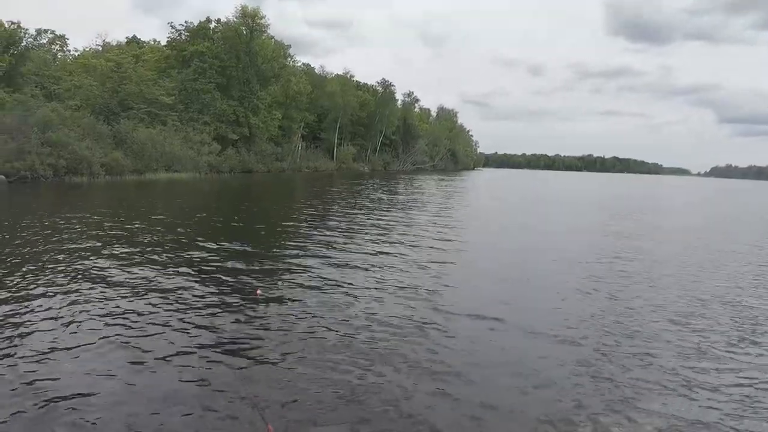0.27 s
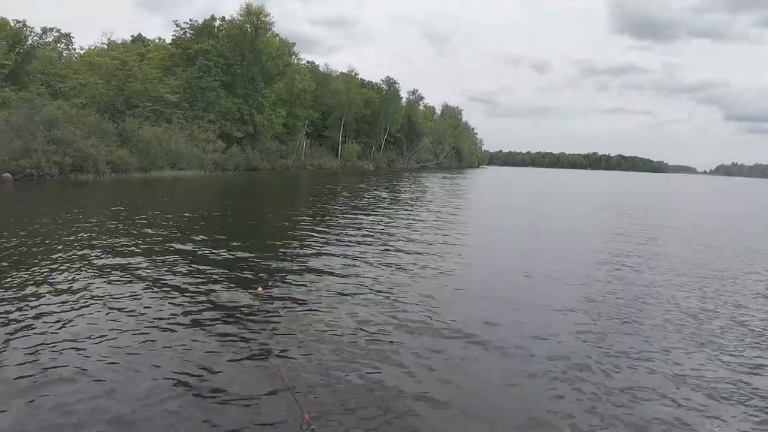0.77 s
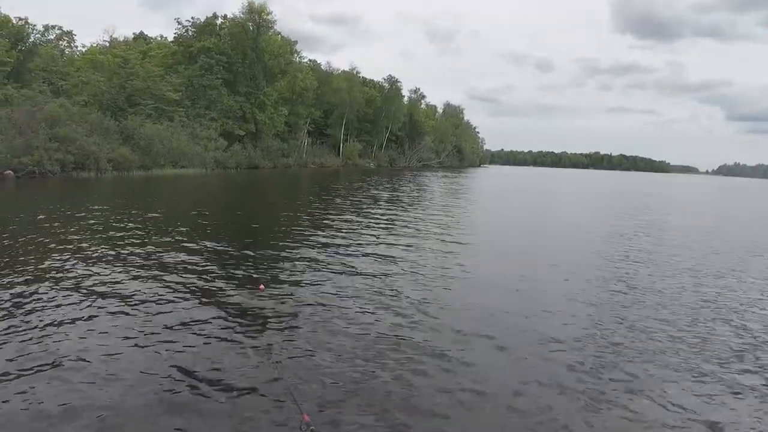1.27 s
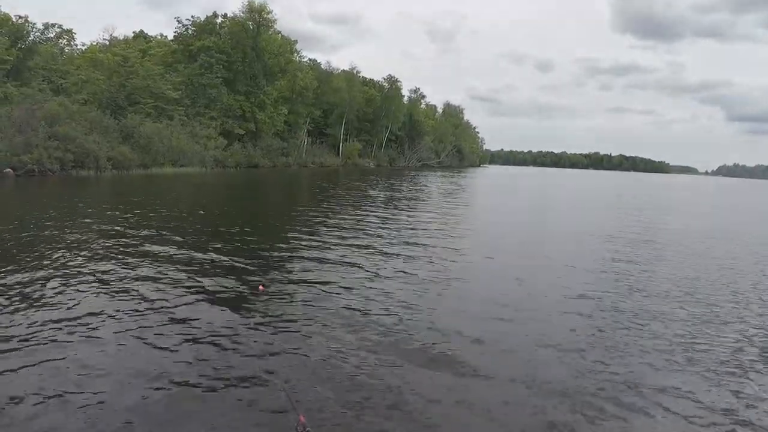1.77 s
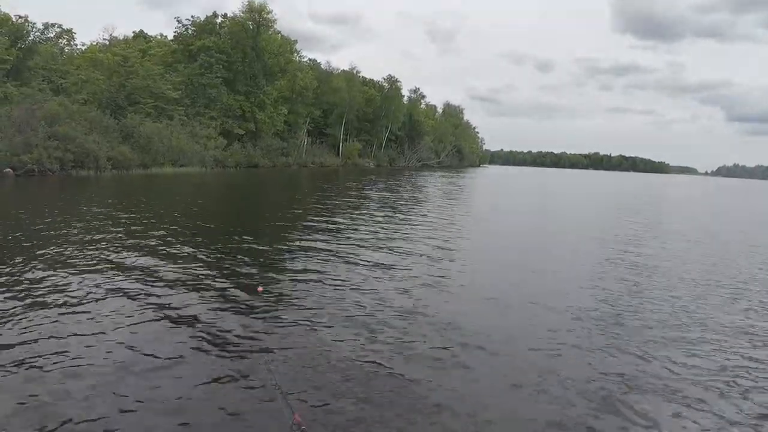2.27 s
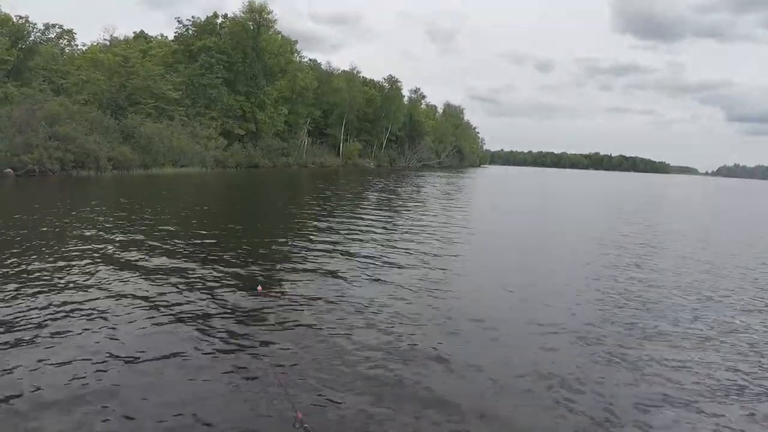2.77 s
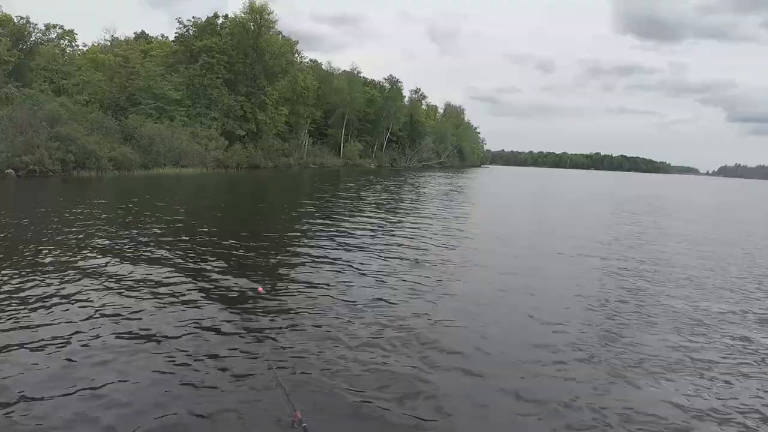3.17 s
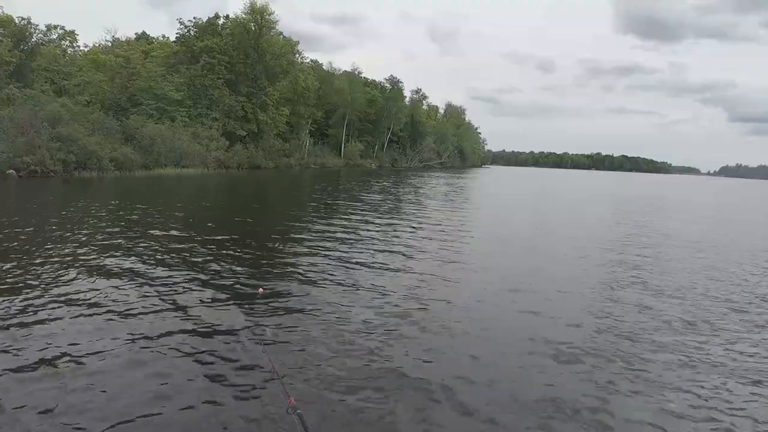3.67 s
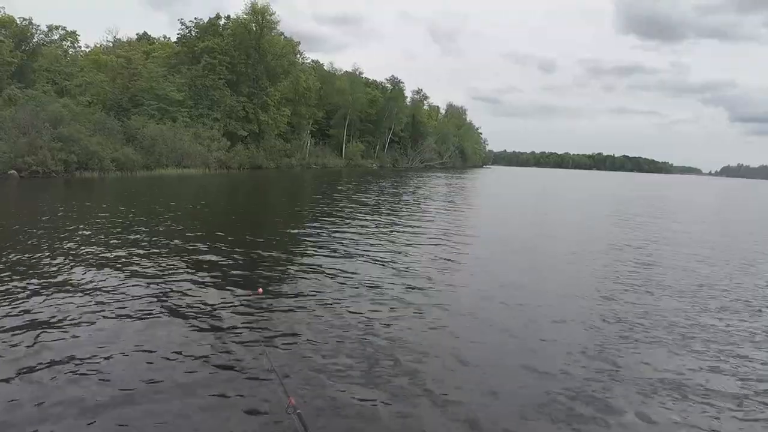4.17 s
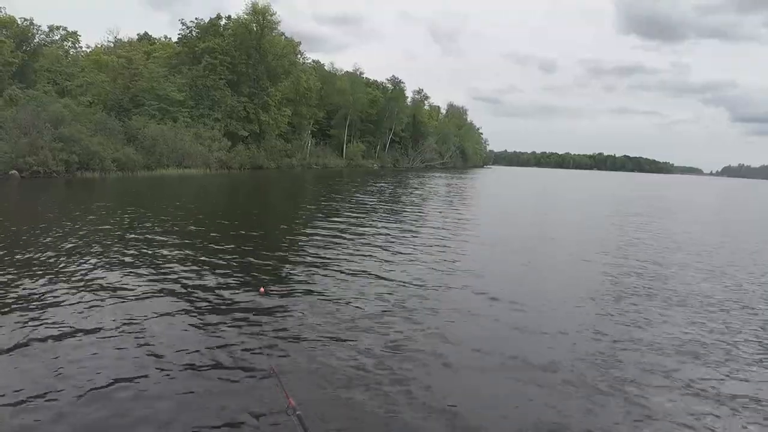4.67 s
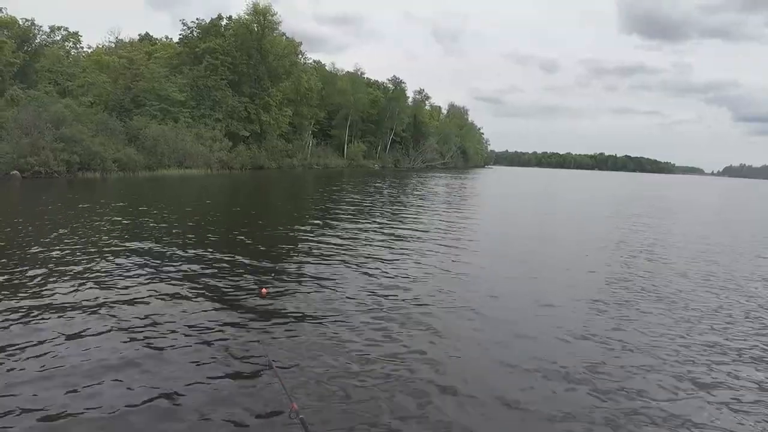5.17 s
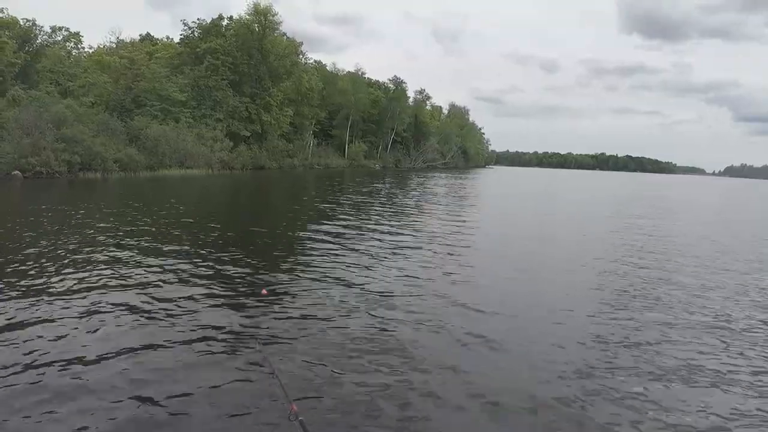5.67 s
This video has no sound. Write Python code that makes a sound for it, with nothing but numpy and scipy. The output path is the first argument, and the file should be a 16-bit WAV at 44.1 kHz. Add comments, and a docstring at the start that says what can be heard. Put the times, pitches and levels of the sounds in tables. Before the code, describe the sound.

Water laps against a small boat on a quiet lake, as wind buffets the microphone, a songbird twitters and a loon calls.

```python
"""Small boat on a lake

A loon gives its quivering call, a songbird whistles, a far crow caws, and the wooded shore
sends back a soft echo. Little waves trap air and knock under the hull, drops tick, water stirs
and leaves hiss. Swirling wind rumbles on the two microphone openings."""
import sys
import numpy as np
from scipy import signal
from scipy.io import wavfile

SR = 44100
rng = np.random.default_rng(int(sys.argv[2]) if len(sys.argv) > 2 else 0)


def master(y):
    """Save y as 16-bit WAV."""
    cut = np.clip(np.atleast_2d(y).T, -1, 1)
    pcm = np.round(cut * 32767)  # scale
    wavfile.write(sys.argv[1], SR, pcm.astype(np.int16))


N = 261513
T = np.arange(N) / SR


def from_db(db):
    """Turn decibels into a number to multiply a sound by."""
    return 10 ** (np.asarray(db) / 20)


def unit_level(x):
    """Scale a signal so its average strength (rms) is 1."""
    return x / np.sqrt(np.mean(x ** 2) + 1e-20)


def left_right(level_db, pan_db):
    """Gains for the two sides; the left is pan_db louder than the right."""
    return from_db([[level_db + pan_db / 2], [level_db - pan_db / 2]])


def at_hz(table, hz):
    """Read a (frequency, value) table between its rows."""
    frequencies, values = np.transpose(table)
    return np.interp(np.log(hz), np.log(frequencies), values)


def band(x, low_hz, high_hz, order=2):
    """Keep the part of a sound between two frequencies."""
    return signal.sosfilt(signal.butter(order, [low_hz, high_hz], "band", fs=SR, output="sos"), x)


def drift(rate_hz):
    """A smooth random wobble, about 1 in size."""
    r = np.exp(-80 * np.pi * rate_hz / SR)
    slow = signal.lfilter([1], [1, -2 * r, r * r], rng.standard_normal(N // 40 + 2002))[2000:]
    return np.interp(np.arange(N) / 40, np.arange(len(slow)), unit_level(slow))


def add(out, start_s, sound):
    """Mix a sound in at the given time."""
    i = max(round(start_s * SR), 0)
    out[..., i:i + sound.shape[-1]] += sound[..., :out.shape[-1] - i]


def flickering_noise(spectrum, likeness, flicker_db, rate_hz):
    """Stereo noise in half-octave bands, each with its own level, flicker and left-right likeness."""
    out, shared_drift = 0, drift(rate_hz / 3)
    edges = 16 * 2 ** np.arange(0, 10.1, .5)
    white = rng.standard_normal((2, 2, N))
    for k, (low, high) in enumerate(zip(edges, edges[1:])):
        hz = np.sqrt(low * high)
        if spectrum[0][0] / 1.3 < hz < spectrum[-1][0] * 1.3:
            mid, side = band(white[k % 2], low, high)
            alike = at_hz(likeness, hz)
            gain = from_db(at_hz(spectrum, hz) + flicker_db * (shared_drift + drift(rate_hz)))
            out = out + gain * (np.sqrt(1 + alike) * mid + np.sqrt(1 - alike) * side * [[1], [-1]])
    return unit_level(out)


# How much of each overtone the loon's throat lets through: (frequency [Hz], gain [dB])
THROAT_GAINS = [(1250, -12.5), (1400, -3.5), (1650, -13.5), (1900, -50.5), (2200, -46.5), (2340, -26.5),
                (2440, -28), (2850, -54), (3200, -38.5), (3450, -49), (3560, -64.5), (3700, -69.5)]
def loon_voice(hz, level_db, lift_db, fade_s=.013):
    """A pure tone plus two overtones shaped by the throat; lift_db changes the lower overtone."""
    t = np.arange(len(hz)) / SR
    phase = 2 * np.pi * np.cumsum(hz) / SR
    second = from_db(at_hz(THROAT_GAINS, 2 * hz) + lift_db) * np.sin(2 * phase)
    third = from_db(at_hz(THROAT_GAINS, 3 * hz)) * np.sin(3 * phase)
    fade = np.clip(np.minimum(t, t[-1] - t) / fade_s, 0, 1)
    return np.sqrt(2) * from_db(level_db) * fade * (np.sin(phase) + second + third)


# The low note that opens each call: (time from the quiver's start [s], pitch [Hz], level vs call [dB])
OPENING_NOTE = [(-.118, 665.5, -21), (-.09, 690, -18), (-.052, 626, -23.5), (.003, 846, -8)]
# Quivering calls: (start [s], length [s], level at top pitch [dB], bottom pitch [Hz], its sag [Hz/s],
# droop of the top pitch [Hz/s^2], slowing of the quiver [Hz/s], overtone lift [dB], head start [swings])
LOON_CALLS = [(-.4, 0.53, -46.5, 950, 169.3, 1305, 7.7, 8.5, 0),
              (1.36, 0.491, -43.5, 999.6, 310, 3394, 24.8, 3.5, .065),
              (5.34, .495, -36, 925.5, 130, 2600, 9.0, -8.5, .01)]
def loon(top_hz=1206, quiver_hz=9.6, max_swings=4.5, lead_s=.6):
    """A low note, then a tone that swings up and down in pitch. Begins lead_s before the scene."""
    out = np.zeros(N + round(lead_s * SR))
    times, pitches, levels = np.transpose(OPENING_NOTE)
    rows = np.arange(len(times))
    place = np.interp(np.arange(times[0], times[-1], 1 / SR), times, rows)
    place = np.floor(place) + .5 - .5 * np.cos(np.pi * (place % 1))   # ease from row to row
    opening_hz, opening_db = np.interp(place, rows, pitches), np.interp(place, rows, levels)
    for start, length, level_db, bottom_hz, sag, droop, slowing, lift_db, head_start in LOON_CALLS:
        t = np.arange(0, length, 1 / SR)
        swing_rate = quiver_hz - slowing * np.maximum(t - .28, 0)
        swings = np.minimum(head_start + np.cumsum(swing_rate) / SR, max_swings)
        # the top starts a little low, and falls again as the bird tires
        top = top_hz - 40 * np.maximum(1 - swings, 0) - droop * np.maximum(t - .2, 0) ** 2
        bottom = bottom_hz - sag * t
        height = (.5 + .5 * np.cos(2 * np.pi * swings)) ** .78   # lingers near the top
        hz = bottom + (top - bottom) * height
        call_db = level_db + .0425 * (hz - top_hz)   # higher is louder
        add(out, lead_s + start, loon_voice(hz, call_db, lift_db))
        add(out, lead_s + start + times[0], loon_voice(opening_hz, level_db + opening_db, lift_db=-.5))
    return out


def shore_echo(sound, delay_s, fade_s, bank_db, bank_s=.28, flutter_db=3.5):
    """Trees scatter a sound into echoes that fall 60 dB in fade_s; the far bank adds a late swell."""
    t = np.arange(0, 1, 1 / SR)
    shape = from_db(-60 * t / fade_s) * np.clip((t - delay_s) / .007, 0, 1)
    shape += from_db(bank_db) * np.exp(-((t - bank_s) / .18) ** 2)
    cloud = rng.standard_normal((2, len(t))) * shape
    cloud /= np.sqrt(np.sum(cloud ** 2) / 2)
    echo = signal.fftconvolve(sound[None], cloud, axes=1)[:, :len(sound)]
    return echo[:, -N:] * from_db(flutter_db * drift(40))   # moving leaves blur it


# The wind's rise and fall: (time [s], relative level [dB], left minus right [dB])
GUSTS = [(0.04, -49, -8), (0.246, -44, 1.0), (0.572, -51, -12), (0.66, -54.5, 11.0), (0.976, -55, -4.5),
         (1.008, -55, 13.5), (1.236, -40, -1.0), (1.418, -44.5, -10), (1.608, -54, 10.0),
         (1.842, -55.5, -2), (1.9, -56.5, 19), (2.0, -55.5, 2.5), (2.38, -50, 2), (2.64, -69, 1.0),
         (2.7, -55, 1), (2.84, -66, -2), (2.92, -45, 2.5), (3.16, -58, 2.0), (5.15, -62, -0.5),
         (5.88, -57.5, 3.0)]
# The wind's deep tone: (frequency [Hz], relative level [dB])
WIND_SPECTRUM = [(11, -31), (18, 10.5), (48, 12.5), (77, 1.5), (129, -26.5), (184, -22.5), (226, -20),
                 (309, -21.5), (400, -34), (520, -77), (880, -120)]
def wind():
    """Swirling air rumbles differently on each microphone opening."""
    times, level_db, pan_db = np.transpose(GUSTS)
    left_db = np.interp(T, times, level_db + pan_db / 2)
    right_db = np.interp(T, times, level_db - pan_db / 2)
    rumble = flickering_noise(WIND_SPECTRUM, [(20, .012), (400, .019)], flicker_db=1.5, rate_hz=30)
    return np.sqrt(2) * from_db([left_db, right_db]) * rumble


# How alike the two sides are, for the water and the hiss: (frequency [Hz], likeness [0 to 1])
SIDE_LIKENESS = [(100, 1), (300, 0.97), (1000, 0.35), (3000, 0.11), (8000, 0.057)]
# The water's rise and fall: (time [s], level [dB])
WATER_LEVELS = [(0.0, -46), (0.21, -47.5), (1.05, -51.5), (1.3, -48.5), (1.74, -55.5), (2.04, -54.5),
                (2.4, -51.5), (2.76, -49.5), (2.94, -55.5), (3.81, -55.5), (4.86, -58.5), (5.9, -54)]
# The water's low tone: (frequency [Hz], relative level [dB])
WATER_SPECTRUM = [(60, -11.5), (100, 0), (140, 1.5), (200, -0.5), (280, -12), (420, -21.5)]
def stirring_water():
    """Water moving round the boat makes a low murmur."""
    level_db = np.interp(T, *np.transpose(WATER_LEVELS))
    return from_db(level_db) * flickering_noise(WATER_SPECTRUM, SIDE_LIKENESS, flicker_db=1, rate_hz=6.2)


# The tone of the background hiss: (frequency [Hz], relative level [dB])
HISS_SPECTRUM = [(150, -16.5), (250, -6), (318, -8.5), (385, -7.5), (563, -12.5), (730, -14.5), (1140, -16),
                 (2060, -24.5), (3010, -22.5), (6120, -30), (7020, -34.5), (9920, -34.5), (12200, -50),
                 (13500, -42.5), (15600, -55.5)]
def leaves_and_hiss(level_db=-70.5):
    """Leaves and the microphone's own noise make a faint, almost steady hiss."""
    return from_db(level_db) * flickering_noise(HISS_SPECTRUM, SIDE_LIKENESS, flicker_db=.25, rate_hz=9)


# Air pockets trapped under the hull: (time [s], level [dB], pitch [Hz], length [s],
# slosh vs knock [dB], relative slap level [dB])
AIR_POCKETS = [(.009, -44.5, 470, 0.015, -8, -53), (.122, -30.5, 348.5, 0.032, -8.5, -56),
               (.123, -26.5, 569, 0.011, -7, -42), (.149, -42, 377, 0.016, 1, -65),
               (.388, -47.5, 572, 0.016, -7, -54), (.674, -51, 167, 0.011, -1, -65),
               (.683, -34, 302, 0.0098, -3, -57.5), (.709, -41.5, 292, 0.032, -16, -49.5),
               (.739, -25, 377, .011, -4.5, -45), (.758, -45, 376, 0.023, -12, -72),
               (.837, -28.5, 577, .014, -16, -68), (1.389, -32, 179, 0.011, -4.5, -54),
               (1.406, -18, 524, 0.0081, -29.5, -30), (1.424, -30, 492.5, 0.021, -20, -55),
               (1.433, -26, 545, 0.0091, -8, -63), (2.12, -47, 808, 0.0086, 1, -54.5),
               (2.175, -29, 678, 0.0097, -12, -43), (2.199, -33, 235, .011, -29, -56),
               (2.206, -33, 435, 0.0094, -6, -49), (2.23, -47.5, 159, 0.041, -15, -60),
               (2.254, -37, 155, 0.0092, -1.5, -69), (2.621, -39, 223.3, 0.053, -10, -50.5),
               (2.63, -34.5, 216, .013, -1.5, -49.5), (2.668, -40, 214, .023, -5, -51.5),
               (2.782, -38.5, 552, .019, -9, -70), (2.833, -27, 550, 0.013, -14, -73),
               (2.894, -35, 612, 0.0093, -11, -43), (2.899, -47, 261, 0.029, -13, -66),
               (3.238, -33.5, 573, 0.011, -10.5, -61), (3.259, -34.5, 420, 0.014, -12.5, -52),
               (3.288, -22.5, 370, 0.018, -15, -49.5), (3.319, -40, 235.5, 0.027, -4.5, -64.5),
               (3.353, -37, 370, .018, -9, -70), (3.478, -43, 370, 0.0094, -11.5, -53),
               (3.498, -42, 435, .019, -13, -64), (3.663, -27, 520, 0.0093, -10.5, -54),
               (3.669, -36.5, 381, .014, -0.5, -59.5), (3.674, -37.5, 610, 0.029, -24, -59),
               (3.699, -42, 546, 0.011, -12, -69), (3.918, -55, 604, 0.0083, -16, -66),
               (3.925, -39, 273.5, 0.023, -3, -67), (4.2, -42, 636, 0.0094, -18, -72),
               (4.208, -33.5, 668, 0.0119, -13, -75), (4.222, -48.5, 642, 0.014, -7, -76),
               (4.612, -31.5, 555, 0.015, -15, -67), (4.625, -44, 570, 0.019, -16, -79),
               (5.161, -36, 581.4, 0.027, -8.5, -68), (5.655, -35.5, 410, 0.036, -17, -61),
               (5.689, -60, 195, 0.02, 1.5, -63), (5.829, -44.5, 518, 0.021, 7, -47.5),
               (5.853, -36, 696, 0.01, -7.5, -38), (5.873, -28, 418, 0.015, -11, -53),
               (5.899, -43, 195, 0.077, -11, -69)]
def knocks(pitch_rise=.041, thump_db=-12, slosh_fade_s=.26):
    """Each air pocket rings briefly at a rising pitch, with a thump and a slap; then water sloshes."""
    out, t = np.zeros(N), np.arange(0, .4, 1 / SR)
    noise = rng.standard_normal((len(AIR_POCKETS), 3, len(t)))
    onset = np.clip(t / .003, 0, 1)
    for (start, level_db, hz, length, slosh_db, slap_db), (spray, push, scatter) in zip(AIR_POCKETS, noise):
        progress = np.clip(t / length, 0, 1)
        swell = np.sin(np.pi * progress ** .8) ** 1.5
        ring = swell * np.sin(2 * np.pi * hz * t * (1 + pitch_rise * progress))
        thump = from_db(thump_db - 60 * t / .13) * unit_level(band(push, .36 * hz, .89 * hz)) * onset
        slap = from_db(slap_db - 1.5 - 60 * t / .043) * band(spray, 800, 3200, order=3)
        knock = from_db(level_db) * (ring + thump) + slap
        fade_s = slosh_fade_s * (400 / hz) ** .47   # low pockets are large and slosh longer
        scatter = scatter * from_db(-60 * t / fade_s) * progress ** 2
        slosh = unit_level(signal.fftconvolve(knock, scatter)[:len(t)]) * np.sqrt(np.mean(knock ** 2))
        add(out, start, knock + from_db(slosh_db) * slosh)
    return out


# The hull's own notes: (pitch [Hz], relative level [dB], time to fade by 60 dB [s])
HULL_NOTES = [(122.1, -2.5, 0.28), (162.3, -7.5, 0.24), (209.5, -2.5, 0.13), (265.6, -8.5, 0.17),
              (335.5, -6.5, 0.19), (364.2, -11, 0.16), (403, -5.5, 0.076), (450.8, -8.5, 0.1),
              (513.6, -13, 0.18), (519.2, -10, 0.093), (580, -6, 0.072), (640, -6.5, 0.049),
              (744, -15, 0.24), (761, -12, 0.074), (913, -11.5, 0.29), (1112, -16, 0.31)]
def hull_ring(knocking, gain_db=-38):
    """The knocks shake the hull, which rings on at its own notes."""
    out = 0
    for k, (hz, level_db, fade_s) in enumerate(HULL_NOTES):
        decay, step = from_db(-60 / (fade_s * SR)), 2 * np.pi * hz / SR
        ring = signal.lfilter([0, np.sin(step)], [1, -2 * decay * np.cos(step), decay ** 2], knocking + 1e-18)
        out += (-1) ** k * from_db(level_db + gain_db) * ring
    return out


# The songbird's notes: (start [s], length [s], first pitch [Hz], middle pitch [Hz], last pitch [Hz],
# first level [dB], last level [dB])
WHISTLES = [(0.029, 0.058, 3290, 3090, 3360, -79, -80), (.96, .045, 4850, 4400, 3380, -77, -76),
            (1.042, 0.038, 2720, 2080, 2770, -69, -62), (1.073, 0.026, 2770, 2250, 2150, -58.5, -72.5),
            (1.098, 0.022, 2200, 2800, 3456, -66, -71), (1.118, 0.023, 3440, 3460, 3370, -69.5, -60.5),
            (1.138, .04, 3390, 2770, 3160, -55, -60), (1.221, 0.038, 2840, 2870, 2930, -70.5, -63.5),
            (1.43, .03, 2760, 2460, 2980, -71, -69.5), (1.458, .02, 3000, 2830, 2620, -70, -65),
            (1.498, 0.073, 2760, 2850, 2780, -58.5, -66.5), (1.752, 0.021, 3267, 3350, 3390, -73, -57),
            (1.769, 0.022, 3080, 2850, 2920, -58.5, -55), (1.787, 0.07, 2908, 3000, 2985, -55, -66),
            (1.858, 0.047, 4690, 2990, 2360, -72, -60), (1.9, 0.025, 2330, 2360, 2340, -61, -68),
            (2.203, .04, 2870, 2900, 2430, -66.5, -75.5), (2.244, 0.035, 2460, 3450, 3340, -67.5, -71.5),
            (2.315, 0.062, 2960, 2640, 2196, -61, -81), (2.386, .055, 2186, 3300, 3970, -71, -77),
            (2.443, 0.029, 4770, 4520, 4400, -62.5, -63), (2.477, .025, 3060, 4300, 5300, -78, -74),
            (2.505, 0.038, 5356, 5390, 5400, -72, -72.5), (2.565, .025, 5410, 5400, 5400, -77, -78),
            (2.604, .047, 3380, 2860, 2450, -57, -43), (2.647, .039, 2440, 3053, 3630, -44, -52.5),
            (2.687, .025, 3664, 2960, 2420, -53.5, -47.5), (2.72, 0.049, 2150, 2632, 2330, -46.5, -46.5),
            (2.769, 0.024, 2340, 2316, 2260, -52, -54), (3.145, .025, 2950, 3160, 3390, -73, -77),
            (3.29, .028, 3270, 2950, 2760, -66, -70), (3.315, .052, 2770, 2750, 2790, -68, -68),
            (3.365, .045, 2770, 3780, 4145, -72, -77), (3.41, .06, 4040, 3890, 4040, -82.5, -79.5),
            (3.488, 0.034, 2890, 2460, 2960, -77, -71), (3.522, .048, 2939, 2750, 2710, -63.5, -58.5),
            (3.58, .075, 2760, 3036, 2700, -66.5, -62.5), (3.657, 0.036, 3070, 3003, 2960, -60, -72),
            (3.672, 0.09, 2554, 2520, 2710, -69, -77), (4.21, 0.048, 4400, 3360, 3220, -86, -68.5),
            (4.259, 0.031, 2950, 2780, 2895, -64, -71), (4.293, 0.042, 3300, 4280, 3440, -75, -83),
            (4.879, 0.037, 5512, 5450, 5400, -78.5, -86), (4.955, .04, 5050, 4440, 4700, -84, -76.5),
            (4.991, 0.032, 4200, 3700, 3250, -80, -64.5), (5.04, .05, 3210, 4070, 3340, -72, -79),
            (5.061, .032, 2810, 2716, 2770, -60, -56.5), (5.089, 0.049, 2945, 3060, 2900, -57, -61.5),
            (5.14, 0.048, 2910, 3105, 2906, -62.5, -70.5), (5.171, 0.06, 3426, 3408, 3400, -54, -72.5),
            (5.267, 0.043, 2850, 2310, 2160, -66.5, -58.5), (5.319, 0.041, 2050, 2370, 2270, -63, -57.5),
            (5.837, .04, 2860, 2900, 2650, -53, -73), (5.887, 0.043, 3640, 3674, 3660, -60, -68)]
def songbird(flutter_db=2.5, fade_s=.006):
    """Pure whistles slide through three pitches; moving air and leaves make them flutter."""
    out = np.zeros(N)
    for start, length, first_hz, middle_hz, last_hz, first_db, last_db in WHISTLES:
        place = np.linspace(-1, 1, round(length * SR))   # 0 is the middle of the note
        bend_hz = (first_hz + last_hz) / 2 - middle_hz
        hz = middle_hz + (last_hz - first_hz) / 2 * place + bend_hz * place ** 2
        fade = np.clip((1 - np.abs(place)) * length / 2 / fade_s, 0, 1)
        level = from_db(np.interp(place, [-1, 1], [first_db, last_db]))
        add(out, start, np.sqrt(2) * fade * level * np.sin(2 * np.pi * np.cumsum(hz) / SR))
    return out * from_db(flutter_db * drift(33))


# The hardest hits of wind: (time [s], level [dB], pitch [Hz], left minus right [dB])
WIND_HITS = [(.062, -26.5, 54, -16), (.086, -27, 66, 18), (0.119, -26.5, 86, 23), (.147, -31.5, 72, -19),
             (.202, -35.5, 85, 21), (.221, -32, 91, -21), (.243, -34.5, 84, -25), (.326, -31.5, 86.4, -20),
             (.486, -32, 69.4, -24.5), (.51, -36.5, 61, -18), (.596, -33.5, 80, -19),
             (1.052, -31.5, 54, 23.5), (1.083, -25.5, 51.5, 20.5), (1.119, -19.5, 68, -12.5),
             (1.141, -24, 85, 22), (1.173, -29.5, 63.3, -15), (1.251, -36, 64, 23),
             (1.349, -27, 71.4, -20.5), (1.379, -25, 74, -19), (1.443, -25, 96, -6)]
def wind_thumps(cycles=1.55):
    """A swirl of air hits the microphone as a short, low pressure wave, a quarter cycle apart per side."""
    out = np.zeros((2, N))
    for start, level_db, hz, pan_db in WIND_HITS:
        turns = np.arange(0, cycles, hz / SR)
        push = np.hanning(len(turns)) * np.sin(2 * np.pi * (turns + [[0], [.25]]))
        add(out, start, left_right(level_db, pan_db) * push)
    return out


# Drops of water: (time [s], level [dB], pitch [Hz], time to fade by 60 dB [s; capped at 0.15],
# left minus right [dB], spray level [dB])
WATER_DROPS = [(.0917, -71, 7000, .013, 17, -91), (0.1262, -45.5, 1143, 0.17, 0, -63),
               (.129, -52, 2640, 0.059, -7, -90), (0.149, -61, 2530, .05, 7.5, -93),
               (0.3754, -51, 1503, 0.066, 2, -80), (.6963, -46.5, 1926, 0.1, -5, -85),
               (0.7095, -49, 1933, 0.079, 3, -85), (0.7398, -46.5, 9100, 0.057, 2, -69),
               (0.8182, -58, 1515, .063, .5, -85), (0.833, -57, 5100, .01, 3, -66),
               (.9093, -70, 6600, .021, 0, -90), (1.3214, -67.5, 7800, .022, 6, -90),
               (1.3698, -51.5, 4140, 0.083, 5, -70), (1.4046, -36, 4020, 0.0095, 1, -44),
               (2.1171, -71, 9940, .05, -2, -80), (2.137, -55, 12100, 0.021, 1, -58),
               (2.175, -40.5, 1550, .027, 0, -62), (2.6511, -53.5, 7160, 0.0094, 0, -68),
               (2.695, -62.5, 4300, 0.024, 11, -82), (2.894, -48, 1163, 0.059, 2, -74),
               (3.235, -52, 3810, 0.095, 4.5, -76), (3.2798, -52, 1146, 0.035, 5.5, -81),
               (3.4176, -72, 9660, .027, -5, -80), (3.5698, -66.5, 2150, .11, 3, -87),
               (4.102, -52.5, 1153, 0.099, 3, -90), (4.435, -56, 9420, 0.036, 1.5, -66),
               (4.437, -53.5, 4320, .03, 6, -80), (4.6064, -58, 4880, 0.044, 5, -78),
               (4.6254, -68, 6460, .03, 5, -78), (4.6578, -60.5, 6530, 0.033, 8, -84),
               (5.8242, -60, 2870, 0.054, 7, -77), (5.8536, -43.5, 1076, 0.08, 0, -72)]
def drops(roughness=.6, puff_db=-4):
    """Each drop makes a small rough ring, a puff of noise around that pitch and a hiss of fine spray."""
    out, t = np.zeros((2, N)), np.arange(0, .2, 1 / SR)
    noise = rng.standard_normal((len(WATER_DROPS), 3, len(t)))
    for (start, level_db, hz, fade_s, pan_db, spray_db), rows in zip(WATER_DROPS, noise):
        mono, stereo = rows[0], rows[1:]
        rough = roughness * unit_level(band(mono, .9 * hz, 1.1 * hz))
        ring = (np.sin(2 * np.pi * hz * t) + rough) * from_db(-60 * t / min(fade_s, .15))
        puff = from_db(puff_db - 60 * t / .038) * band(stereo, .5 * hz, 1.54 * hz, order=3)
        spray = from_db(spray_db - level_db - 60 * t / .025) * band(stereo + mono, 3500, 10500, order=3)
        onset = np.sin(np.pi / 2 * np.clip(t / (.001 + 2 / hz), 0, 1)) ** 2
        add(out, start, left_right(level_db, pan_db) * onset * (ring + puff + spray))
    return out


# The far crow's calls: (start [s], length [s], first pitch [Hz], last pitch [Hz], mid-call level [dB],
# throat note [Hz], hoarseness [0 to 1])
CAWS = [(.47, .16, 345.5, 297.4, -66.5, 1665, 0), (.92, 0.15, 330, 304, -76.5, 1660, 0.05),
        (1.11, 0.24, 126.5, 130.3, -57.5, 1839, .7), (2.42, 0.29, 129.7, 133, -74.5, 1770, .8)]
def crow(width_hz=250, swell_db=11, opening_hz=150):
    """A buzzy, hoarse voice; only the part near the note the throat rings at carries this far."""
    out = np.zeros(N)
    low_pass = signal.butter(2, .7 * width_hz, fs=SR, output="sos")
    breath = signal.sosfilt(low_pass, rng.standard_normal((2, N)))
    harmonics = np.arange(2, 24)[:, None]   # whole multiples of the pitch
    for start, length, first_hz, last_hz, level_db, throat_hz, hoarse in CAWS:
        place = np.linspace(-1, 1, round(length * SR))
        hz = np.interp(place, [-1, 1], [first_hz, last_hz])
        centre_hz = throat_hz - opening_hz * ((place - .2) ** 2 - .5)   # highest near mid-call
        weights = np.exp(-((harmonics * hz - centre_hz) / width_hz) ** 2)
        buzz = np.sum(weights * np.cos(2 * np.pi * harmonics * np.cumsum(hz) / SR), axis=0)
        breath_a, breath_b = breath[:, round(start * SR):][:, :len(place)]
        phase = 2 * np.pi * np.cumsum(centre_hz) / SR
        rasp = breath_a * np.cos(phase) + breath_b * np.sin(phase)   # noise moved up to the throat note
        voice = (1 - hoarse) * unit_level(buzz) + hoarse * unit_level(rasp)
        fade = np.clip((1 - np.abs(place)) * length / .042, 0, 1)
        add(out, start, from_db(level_db - swell_db * place ** 2) * fade * unit_level(voice))
    return out


def scene():
    """Mix the birds, the boat, their echoes, the water and the wind in stereo."""
    call, song, caw = loon(), songbird(), crow()
    slightly_left = left_right(0, pan_db=.6)
    birds = call[-N:] * slightly_left + song * from_db([[.1], [-1.5]]) + caw
    tree_birds = from_db(-5.5) * song + from_db(-8) * caw
    echoes = from_db(-15) * shore_echo(call, delay_s=.0075, fade_s=.25, bank_db=-17)
    echoes += shore_echo(tree_birds, delay_s=.01, fade_s=.26, bank_db=-36.5)
    knocking = knocks()
    boat = knocking + hull_ring(knocking)
    echoes += from_db(-23.5) * shore_echo(boat, delay_s=.0014, fade_s=.2, bank_db=-53)
    water = boat * slightly_left + drops() + stirring_water()
    return birds + echoes + water + leaves_and_hiss() + wind() + wind_thumps()


def record(dry, cutoff_hz=15700):
    """The microphone lifts the high treble and cuts everything above it; the very end fades out."""
    brightened = dry + .8 * band(dry, 12800, 15400)
    out = signal.sosfilt(signal.ellip(10, .5, 70, cutoff_hz, fs=SR, output="sos"), brightened)
    return out * np.clip((T[-1] - T) / .004, 0, 1)


dry = scene()
out = record(dry)
master(out)
```